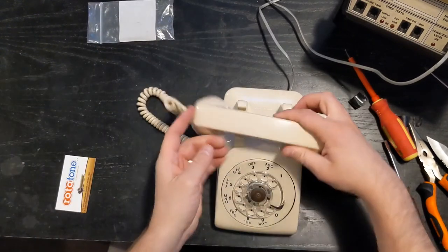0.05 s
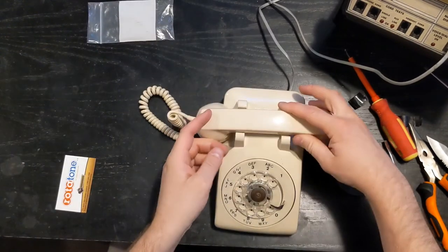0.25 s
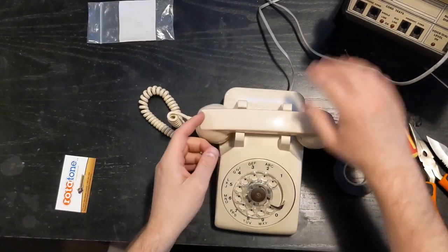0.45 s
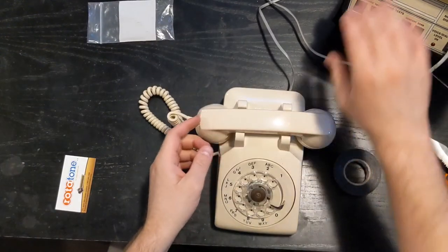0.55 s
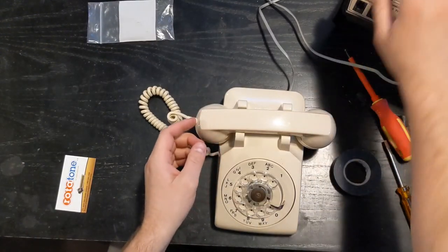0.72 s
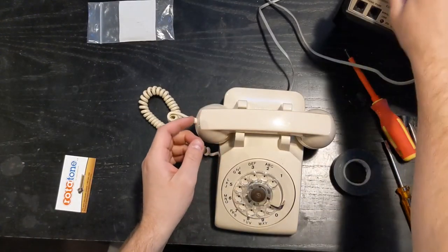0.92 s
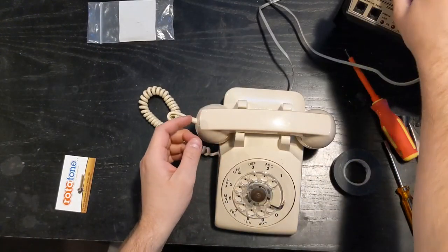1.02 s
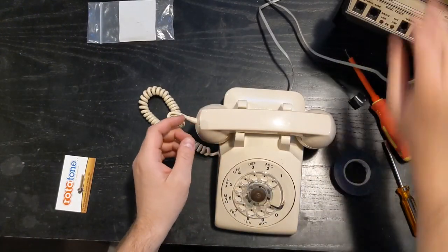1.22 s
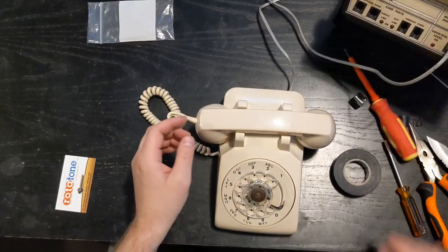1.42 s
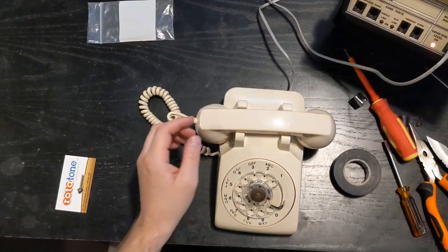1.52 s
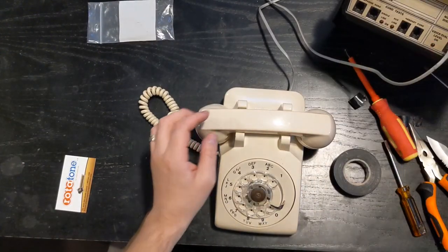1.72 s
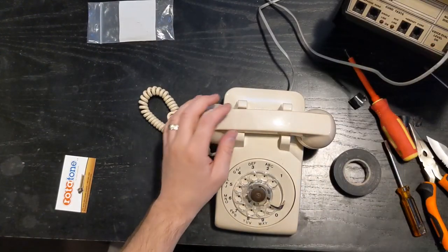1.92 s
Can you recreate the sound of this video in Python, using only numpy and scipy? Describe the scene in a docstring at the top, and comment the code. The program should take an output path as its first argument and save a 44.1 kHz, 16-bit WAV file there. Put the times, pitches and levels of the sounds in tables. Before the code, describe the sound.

A hard plastic telephone handset lands on its cradle at about 0.2 seconds, one end then the other, with hollow knocks, bright clicks and a low workbench boom that fades quickly. Around 1 second a hand softly bumps a metal box and a switch snaps sharply, slightly left. From 1.5 to 1.8 seconds fingers faintly tick and rub on the handset. Everything is close, in a small, quietly humming room.

```python
"""A handset drops onto its cradle

A hard plastic telephone handset lands one end after the other: each impact excites the modes of its
shell, the hook switch clicks, and the telephone's weight sets the workbench booming. A hand bumps a
metal box and snaps a switch on it, then fingers nudge the handset by its cord, ticking and rubbing.
Two microphones just above the bench hear it all in a small live room with a low hum."""
import sys
import numpy as np
from scipy import signal
from scipy.fft import rfft, irfft, next_fast_len
from scipy.io import wavfile

SR = 44100
rng = np.random.default_rng(int(sys.argv[2]) if len(sys.argv) > 2 else 0)


def store_wav(level_fs):
    """Save 16-bit WAV to argv[1]."""
    pcm = np.round(np.clip(np.atleast_2d(level_fs), -1, 1) * 32767)
    wavfile.write(sys.argv[1], SR, pcm.T.astype(np.int16))


N = 85995
T = np.arange(N) / SR
BANDS = 1000 * 2 ** (np.arange(-15, 13) / 3)  # third-octave centres [Hz]
RIPPLE_DB, RIPPLE_HZ = 2, 69.66  # depth and spacing of the narrow peaks among dense modes
ROOM_BUILD_S = 0.0042  # rise time of the reverberation


def handset():
    """Modal excitation: where plastic strikes plastic decides how strongly each shell mode rings."""
    # impacts on the cradle: (time [s], level [dB], tilt [dB/octave], ring level [dB],
    # place [0 first end, 1 other end])
    knocks = [(0.1747, -45.5, -2, -51, 0.2), (0.2188, -22, 0.94, -31.5, 0.053),
              (.2236, -21, -0.5, -20, 0.16), (.2275, -24, -1, -34.5, 0), (.26, -39, 3.5, -45, 0.46),
              (0.3487, -29.5, -2, -42, 1), (.3512, -29, -2, -25, 0.98), (.359, -35.5, 0, -55, 0.44)]
    # handset and housing: (frequency [Hz], level at first end [dB], at other end [dB], t60 [s])
    shell_modes = [(345, -11, -9, 0.146), (500.4, 4, -9, 0.2), (559, -13, -2.5, 0.089),
                   (575.8, 0.5, -15, .17), (664.5, -6, -3.5, 0.094), (779, 3, -24, 0.21),
                   (1003, -5, -3.5, 0.11), (1076, -13, -4.5, 0.15), (1334, 0, -7, 0.085),
                   (1543.3, -2.5, -7.5, 0.16), (1898, -3.5, -11, 0.12), (2283, -12, -18, 0.11),
                   (2820, -8.5, -16, 0.17), (3200, 3, -28, 0.064)]
    # spectrum of their dense, fast-dying modes: (frequency [Hz], band level [dB])
    shell_colour = [(40, -32), (200, -10), (350, -7.5), (700, -1.5), (1200, 0), (2000, -3), (3800, -1),
                    (5500, -6), (7300, -3), (10000, -4.5), (15000, -2)]
    bands = noise_bands(RIPPLE_DB)
    times, _, _, ring_db, place = np.transpose(knocks)
    tone = 0
    for hz, first_db, other_db, t60 in shell_modes:
        strike_db = ring_db + place * (other_db - first_db)
        tone = tone + ring(times, strike_db, [(hz, first_db, t60)], spread_db=1)
    return clatter(bands, knocks, shell_colour, t60=0.043, room_db=-14) + in_room(tone)


def hook_switch():
    """Impact noise: the plungers work the switch, whose brief contacts excite a wide, bright band."""
    # switch contacts: (time [s], level [dB], tilt [dB/octave])
    contacts = [(0.288, -33.5, 1), (0.3353, -34, 1), (0.3646, -38, 2)]
    # click spectrum: (frequency [Hz], band level [dB])
    click_colour = [(300, -33), (1500, -7), (4500, -6), (7500, -2), (10500, -2), (15000, -12)]
    return clatter(noise_bands(RIPPLE_DB), contacts, click_colour, t60=0.09, room_db=-15)


def bench():
    """Forced motion, then free decay: the telephone rocks on soft feet and leaves the bench ringing."""
    # pushes on the bench top: (time [s], level [dB], frequency [Hz])
    thuds = [(0.228, -14, 127), (.283, -18.5, 105.5), (.367, -18.5, 102.5)]
    # low modes of bench and room: (frequency [Hz], level [dB], t60 [s])
    boom_modes = [(46, -23, .35), (91.8, -23.5, 1), (114.2, -13, 0.66), (156.4, -17, 0.35)]
    peak_s, sharpness = 0.01872, 2.76
    forced = 0
    for start, level_db, hz in thuds:
        age = np.maximum(T - start, 0)
        swell = (age / peak_s * np.exp(1 - age / peak_s)) ** sharpness
        forced = forced + from_db(level_db) * swell * np.sin(2 * np.pi * hz * age)
    times, levels, _ = np.transpose(thuds)
    return forced + ring(times + peak_s, levels, boom_modes, spread_db=4.5)


def box_switch():
    """Heavy damping: the switch's high modes die within milliseconds, heard as a snap to the left."""
    # impacts in the switch: (time [s], level [dB], tilt [dB/octave])
    snaps = [(1.0388, -18.5, 0), (1.0402, -22, 1.5)]
    # snap spectrum: (frequency [Hz], band level [dB])
    snap_colour = [(100, -29), (300, -26), (800, -33), (1500, -29), (2600, -8), (3500, -14), (4400, -11),
                   (6000, -15), (9500, -2.5), (12000, -0.5), (14500, 0.5)]
    # the switch's own ring: (frequency [Hz], level [dB], t60 [s])
    switch_modes = [(2530, -5, .015), (8300, 3, .004), (9900, 5, .005), (13700, 5, .004)]
    pan_db = 6  # left over right
    bands = noise_bands(RIPPLE_DB)
    times, levels, _ = np.transpose(snaps)
    crack = ring(times, levels, switch_modes, spread_db=2.5) * from_db([[pan_db / 2], [-pan_db / 2]])
    return crack + clatter(bands, snaps, snap_colour, t60=0.021, room_db=-14, pan_db=pan_db)


def box_bumps():
    """Soft impact: a hand excites mainly the low modes of the metal box, so it sounds dull."""
    # touches of the hand, the second a knock against the table: (time [s], level [dB], tilt [dB/octave], ring
    # level [dB])
    bumps = [(.936, -43.5, 4, -37), (.951, -49.5, -1.5, -36.5), (1.045, -43.5, -1, -36),
             (1.0732, -38, -0.5, -30)]
    # bump spectrum: (frequency [Hz], band level [dB])
    box_colour = [(60, -17.5), (110, -16), (170, -4), (270, -2.5), (480, -6), (850, -3), (1500, -8.5),
                  (2400, -11), (5000, -48), (15000, -34)]
    # resonances of the box: (frequency [Hz], level [dB], t60 [s])
    box_modes = [(169, -0.5, 0.12), (203, -3, 0.082), (273.4, 0.5, 0.15), (817, -12, .2)]
    times, _, _, ring_db = np.transpose(bumps)
    thumps = clatter(noise_bands(), bumps, box_colour, t60=0.11, room_db=-7.5)
    return thumps + in_room(ring(times, ring_db, box_modes, spread_db=1))


def fingers():
    """Resonance: light ticks of fingers and cord wake the hollow note of the resting handset."""
    # light contacts: (time [s], level [dB], tilt [dB/octave], ring level [dB])
    ticks = [(1.479, -63, 4.5, -44), (1.487, -66.5, 4, -39), (1.5742, -41, -1.5, -47),
             (1.717, -50.5, -5.5, -58), (1.789, -54.5, 1.5, -46.5), (1.796, -58, -7, -39)]
    # tick spectrum: (frequency [Hz], band level [dB])
    tick_colour = [(200, -33), (1000, -26), (2500, -8), (4200, -2.5), (6000, -5), (10000, 3.5),
                   (15000, 4.5)]
    # resonances of the resting handset: (frequency [Hz], level [dB], t60 [s])
    hollow_modes = [(397.6, -7, 0.21), (533, 0, 0.1), (563, -8.5, 0.1), (1333, -5, 0.17)]
    times, _, _, ring_db = np.transpose(ticks)
    ticking = clatter(noise_bands(RIPPLE_DB), ticks, tick_colour, t60=0.066, room_db=-9.5)
    return ticking + ring(times, ring_db, hollow_modes, spread_db=0.5)


def rubbing():
    """Sliding friction: skin and cord make grainy noise that swells, holds and dies away."""
    # slides: (start [s], length [s], level [dB])
    rubs = [(-.05, 0.45, -70), (0.817, 0.05, -66), (0.905, 0.039, -62), (1.455, 0.13, -59),
            (1.785, 0.028, -68.5)]
    # friction spectrum: (frequency [Hz], band level [dB])
    rub_colour = [(200, -13.5), (700, -4.5), (2000, -5), (4200, -4), (6500, -2.5), (10000, 0),
                  (15000, -1.5)]
    rise_s, release_t60_s, grain_db, grain_hz = 0.027, 0.42, 0.5, 310
    envelope = 0
    for start, length, db in rubs:
        attack = np.clip((T - start) / rise_s, 0, 1)
        release = from_db(-60 * np.maximum(T - start - length, 0) / release_t60_s)
        envelope = envelope + from_db(db) * attack * release
    grain = from_db(grain_db * random_curve(T * grain_hz))
    return envelope * grain * steady_noise(rub_colour)


def background():
    """Superposition: the steady tones of a hum lie over the continuous spectrum of the room air."""
    # hum tones: (frequency [Hz], level [dB])
    hum_tones = [(92, -55.5), (119, -53.5), (259, -66), (288, -65), (1324, -73.5)]
    # room air: (frequency [Hz], band level [dB])
    air_colour = [(30, -83), (48, -62), (70, -62), (110, -50.5), (180, -62.5), (280, -63), (500, -66.5),
                  (1200, -67.5), (2000, -76), (4000, -72.5), (7000, -79), (15000, -79)]
    hum = sum(from_db(db) * np.sin(2 * np.pi * (hz * T + rng.random())) for hz, db in hum_tones)
    return np.sqrt(2) * hum + steady_noise(air_colour)


def ring(times, levels, modes, spread_db):
    """Damped oscillators: each contact starts a decaying sine in every mode, varying in strength."""
    out = 0
    for hz, db, t60 in modes:
        radius, angle = from_db(-60 / (t60 * SR)), 2 * np.pi * hz / SR
        blows = impulses(times, from_db(levels + db + spread_db * rng.standard_normal(len(times))))
        feedback = [1, -2 * radius * np.cos(angle), radius ** 2]
        out = out + signal.lfilter([0, np.sin(angle)], feedback, blows + 1e-18)
    return out


def clatter(bands, hits, colour, t60, room_db, pan_db=0):
    """Modal overlap: dense modes merge into decaying noise, and the room answers band by band."""
    # reverberation time of the room: (frequency [Hz], t60 [s])
    room_t60 = [(100, 0.61), (500, 0.37), (4000, 0.48), (10000, 0.41), (15000, 0.33)]
    times, levels, tilts = np.transpose(hits)[:3]
    out, side_power = 0, from_db([[pan_db], [-pan_db]])
    for hz, noise in zip(BANDS, bands):
        ratio = hz / 1500  # tilt and t60 refer to 1500 Hz
        band_db = levels + at_hz(colour, hz) + tilts * np.log2(ratio)
        power = impulses(times, from_db(band_db) ** 2)
        direct = fade(power, t60 / ratio ** 0.19)  # higher modes die sooner
        room = from_db(room_db) ** 2 * soften(fade(power, at_hz(room_t60, hz)), ROOM_BUILD_S)
        out = out + noise * np.sqrt(direct * side_power + room)
    return out


def in_room(x, t60=0.46, room_db=-10):
    """Reverberation: convolution with decaying noise adds the scattered echoes of the walls."""
    noise = sum(np.sqrt(hz) * band for hz, band in zip(BANDS, noise_bands()))
    tail = noise * from_db(-60 * T / t60) * (1 - np.exp(-T / ROOM_BUILD_S))
    tail /= np.sqrt(np.sum(tail ** 2) / 2)
    echoes = signal.fftconvolve(x[None], tail, axes=1)[:, :N]
    return x + from_db(room_db) * echoes


def noise_bands(ripple_db=0):
    """Diffuse-field coherence: third octaves of unit-rms noise, alike left and right in the bass."""
    # likeness of left and right: (frequency [Hz], correlation [0 to 1])
    likeness = [(40, .8), (100, .97), (700, .97), (1400, .88), (2800, .5), (5000, .1), (15000, 0)]
    size = next_fast_len(N)
    hz = np.arange(size // 2 + 1) * SR / size
    ripple = from_db(ripple_db * random_curve(hz / RIPPLE_HZ))
    spectrum = rfft(rng.standard_normal((2, size))) * ripple
    bands = []
    for centre in BANDS:
        in_band = abs(np.log2((hz + 1) / centre)) < 1 / 6
        mid, side = irfft(spectrum * in_band, size)[:, :N]
        alike = at_hz(likeness, centre)
        pair = np.sqrt(1 + alike) * mid + np.sqrt(1 - alike) * side * [[1], [-1]]
        bands.append(pair / pair.std())
    return bands


def steady_noise(colour):
    """Spectral shaping: weighted noise bands add up to the given spectrum."""
    return sum(from_db(at_hz(colour, hz)) * noise for hz, noise in zip(BANDS, noise_bands()))


def random_curve(position):
    """Linear interpolation between Gaussian values one unit apart."""
    knots = rng.standard_normal(2000)
    return np.interp(position, np.arange(len(knots)), knots)


def impulses(times, sizes):
    """Ideal impacts: one impulse for each contact."""
    out = np.zeros(N)
    np.add.at(out, np.clip((np.asarray(times) * SR).astype(int), 0, N - 1), sizes)
    return out


def fade(power, t60):
    """Exponential decay: power falls by 60 dB in t60 seconds."""
    return signal.lfilter([1], [1, -from_db(-120 / (t60 * SR))], power + 1e-18)


def soften(x, seconds):
    """First-order lag with the given time constant."""
    pole = np.exp(-1 / (seconds * SR))
    return signal.lfilter([1 - pole], [1, -pole], x + 1e-18)


def from_db(db):
    """Decibels to amplitude ratio."""
    return 10 ** (np.asarray(db) / 20)


def at_hz(points, hz, column=1):
    """Interpolation of a table column on a log-frequency axis."""
    table = np.array(points)
    return np.interp(np.log(hz + 1), np.log(table[:, 0]), table[:, column])


def scene():
    """Superposition: the pressures of all sources add."""
    telephone = handset() + hook_switch() + bench()
    return telephone + box_switch() + box_bumps() + fingers() + rubbing() + background()


def record(dry):
    """Frequency response: each microphone colours the sound, the right lags; rumble and top are cut."""
    # microphone responses: (frequency [Hz], left gain [dB], right gain [dB])
    mics = [(113, -6, 0.5), (324, 1, 0.5), (9400, 0, 0.5), (10500, -0.5, -0.5), (14450, -11.5, 9),
            (16400, 0, -2.5)]
    right_lag_s, low_cut_hz, high_cut_hz = 0.00007, 39, 16000
    size = next_fast_len(N + SR // 10)
    hz = np.arange(size // 2 + 1) * SR / size
    left = from_db(at_hz(mics, hz, column=1))
    right = from_db(at_hz(mics, hz, column=2)) * np.exp(-2j * np.pi * hz * right_lag_s)
    heard = irfft(rfft(dry, size) * np.array([left, right]), size)[:, :N]
    heard = signal.sosfilt(signal.butter(2, low_cut_hz, "high", fs=SR, output="sos"), heard)
    return signal.sosfilt(signal.ellip(12, .2, 100, high_cut_hz, fs=SR, output="sos"), heard)


dry = scene()
out = record(dry)
store_wav(out)
```